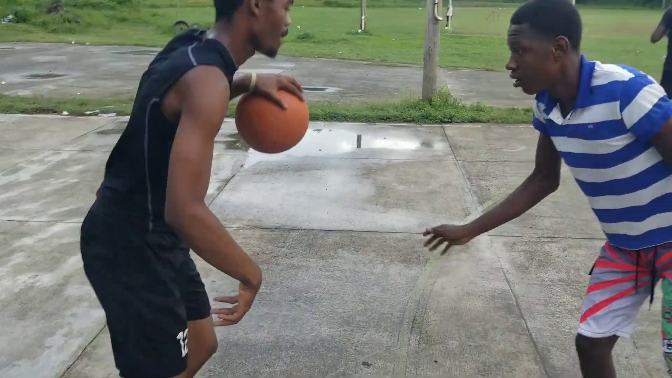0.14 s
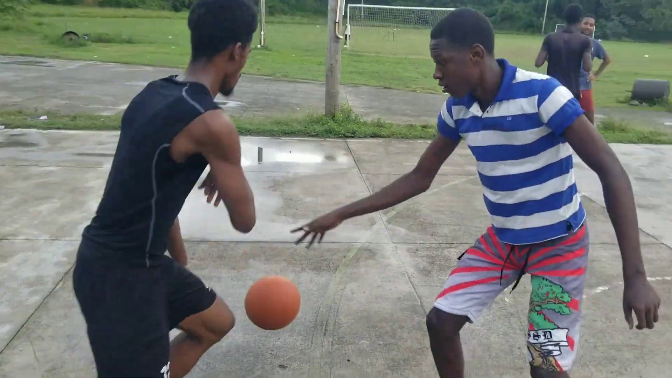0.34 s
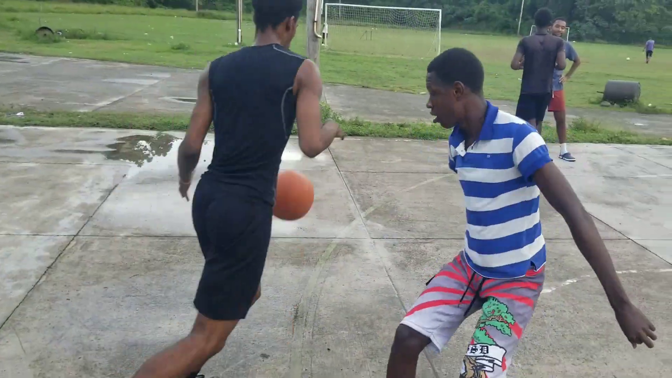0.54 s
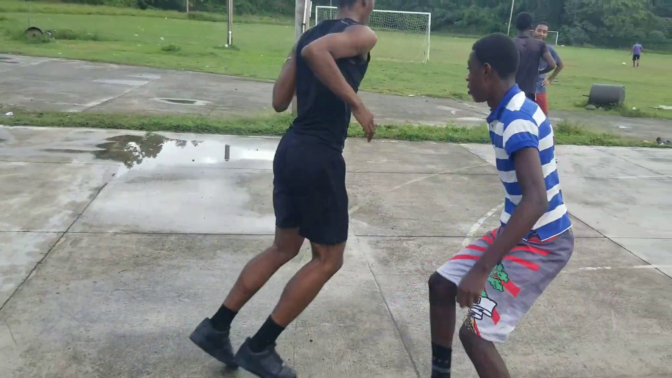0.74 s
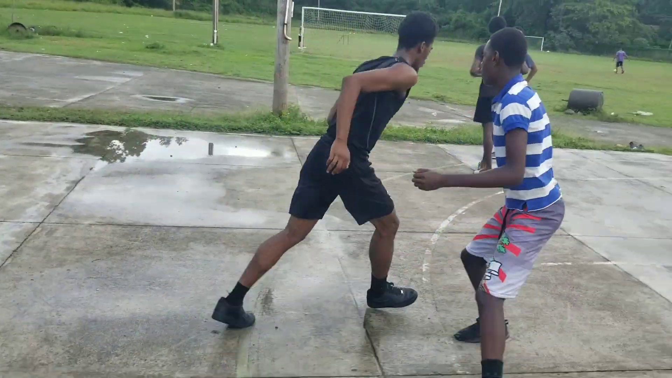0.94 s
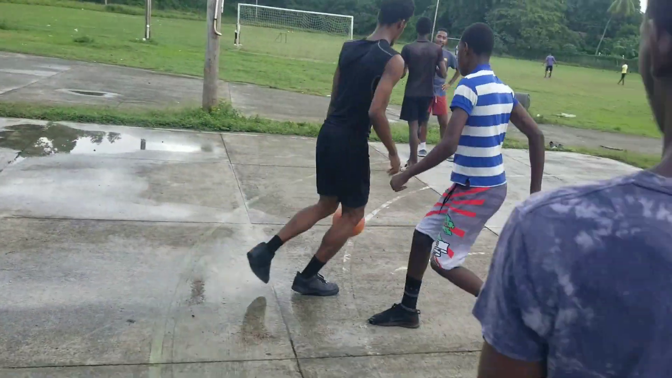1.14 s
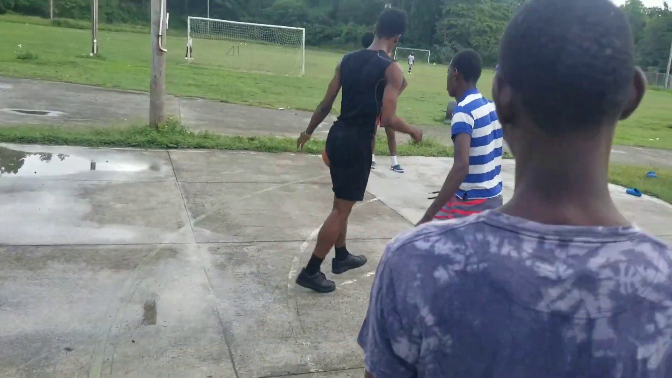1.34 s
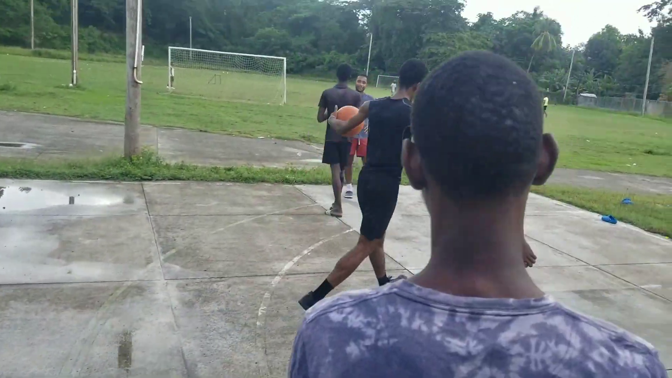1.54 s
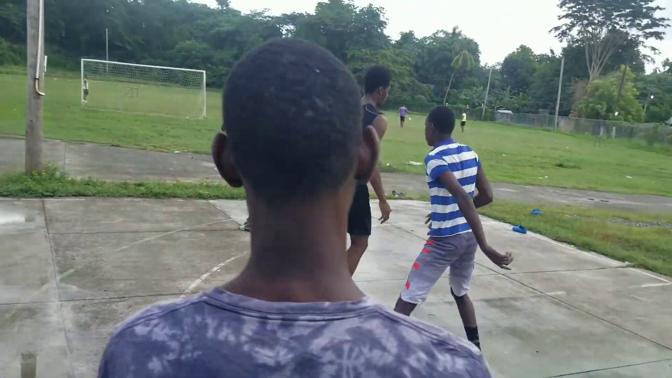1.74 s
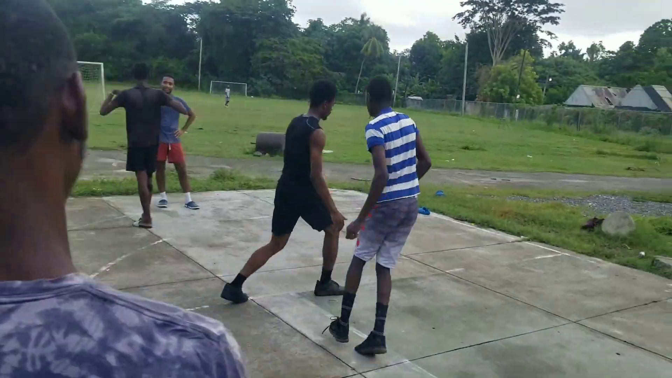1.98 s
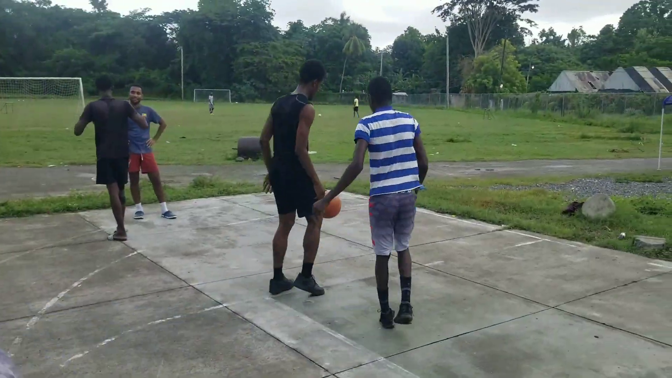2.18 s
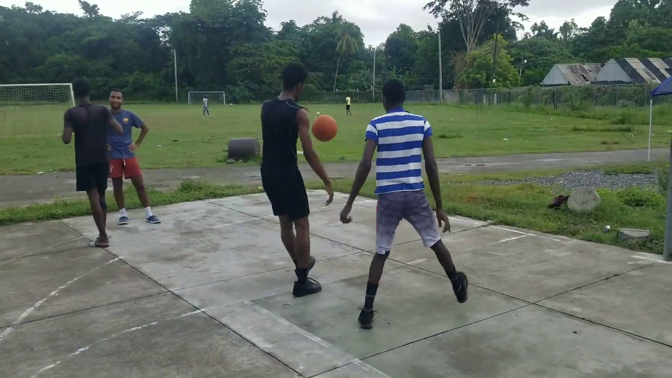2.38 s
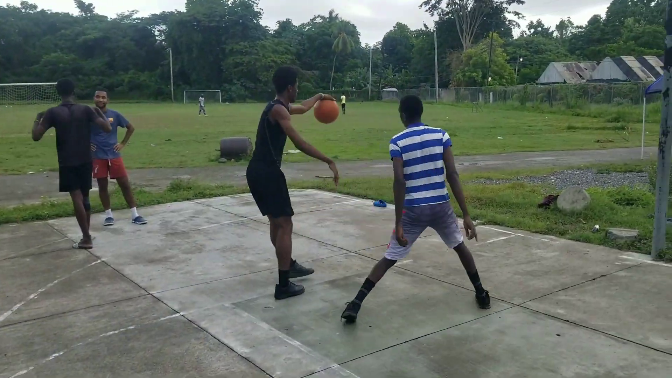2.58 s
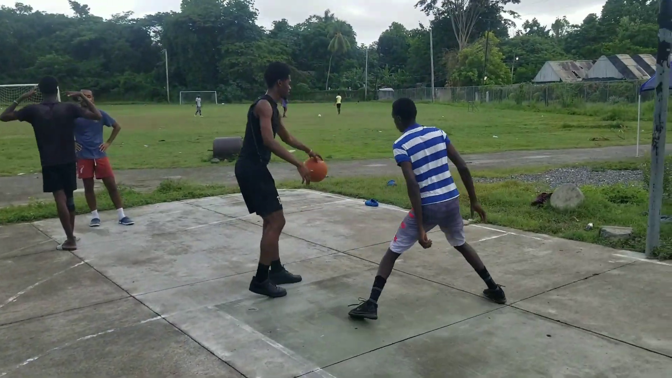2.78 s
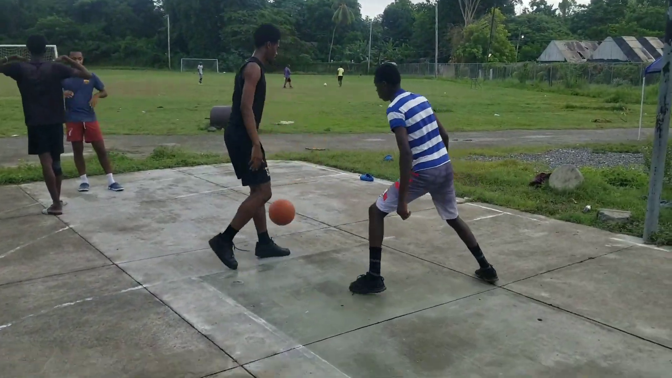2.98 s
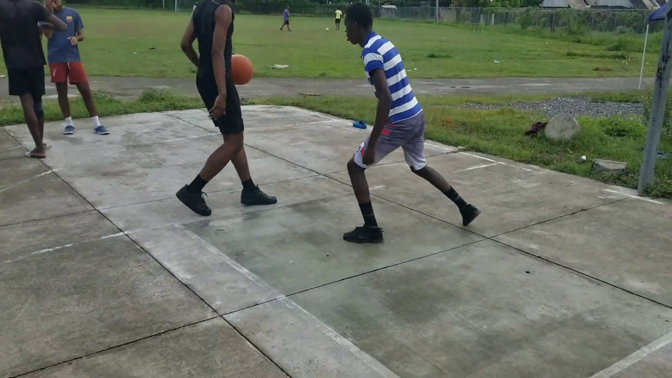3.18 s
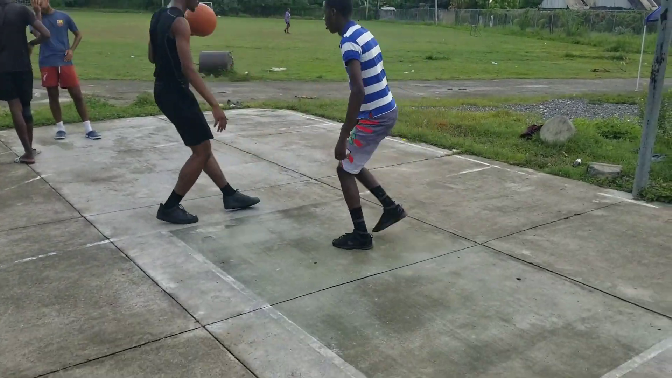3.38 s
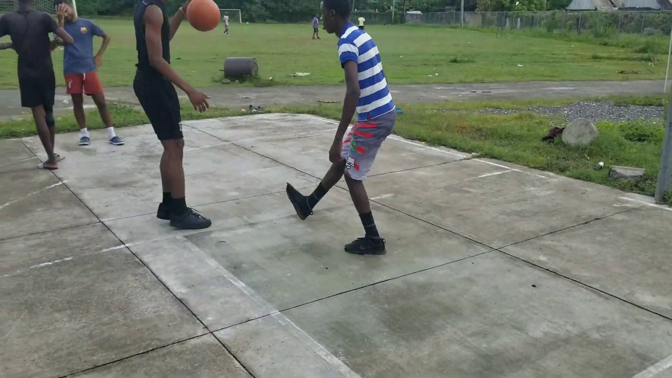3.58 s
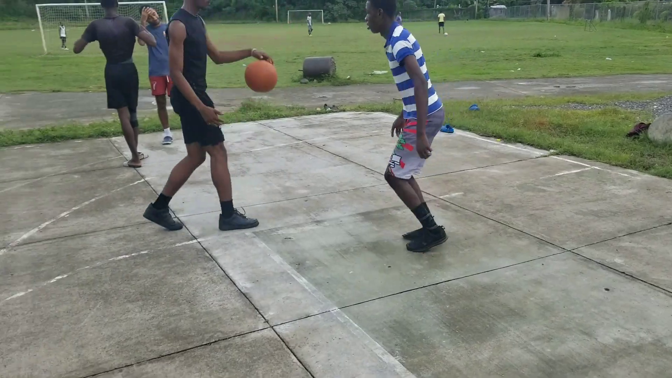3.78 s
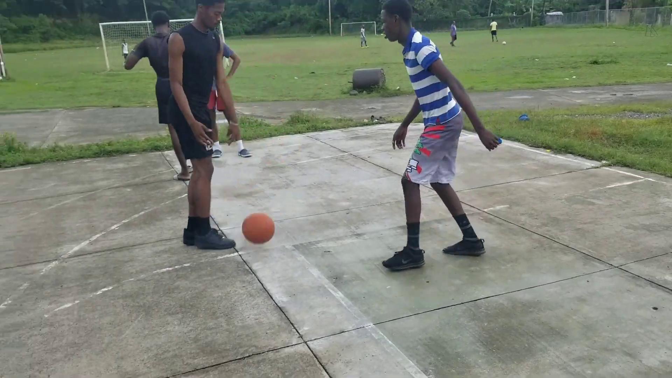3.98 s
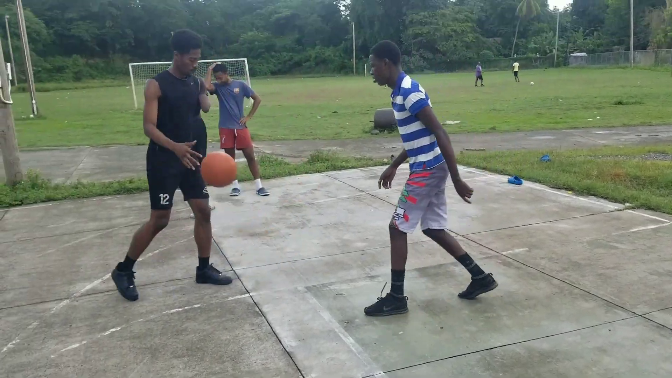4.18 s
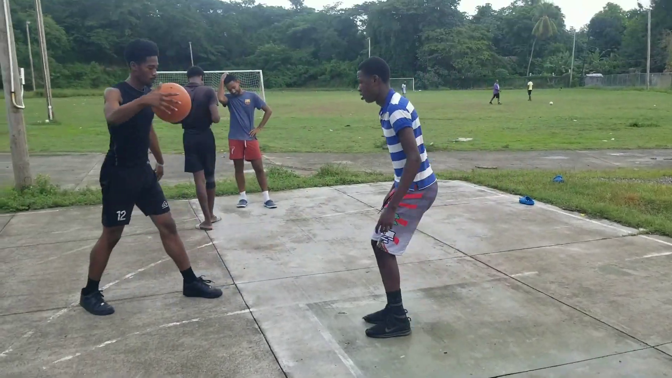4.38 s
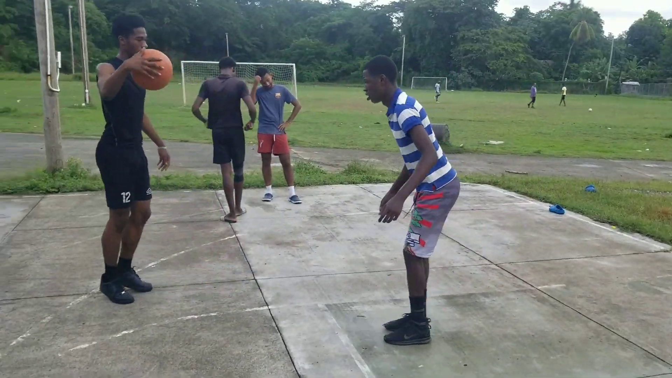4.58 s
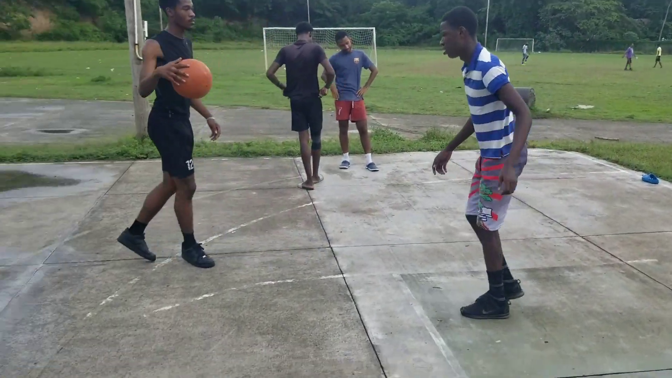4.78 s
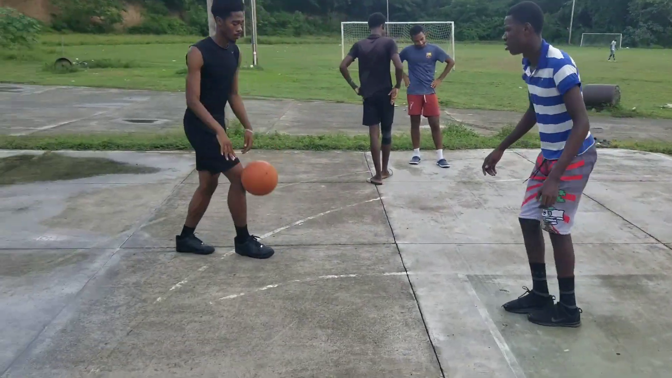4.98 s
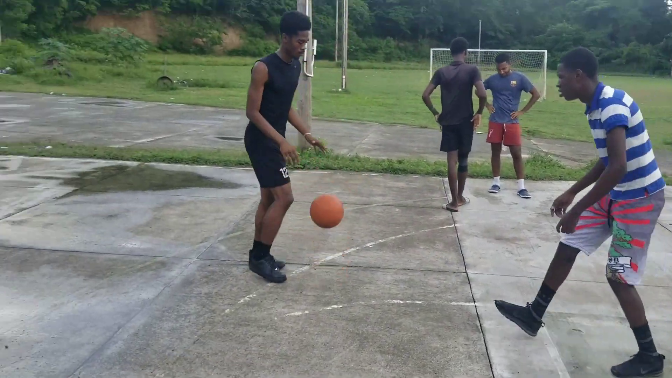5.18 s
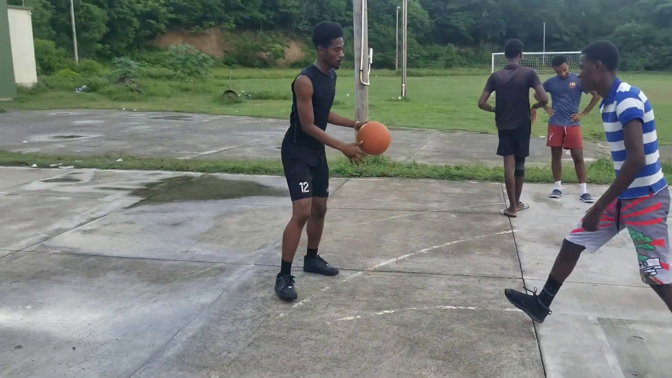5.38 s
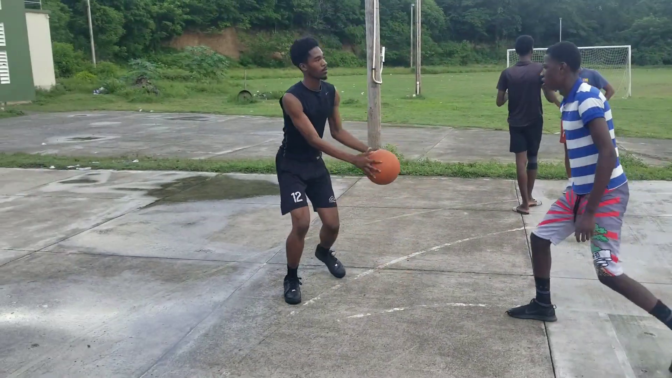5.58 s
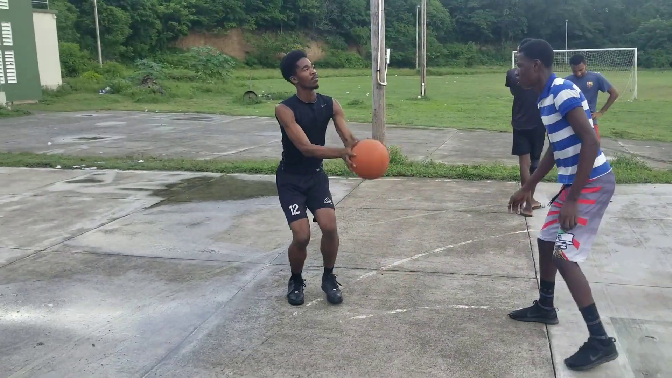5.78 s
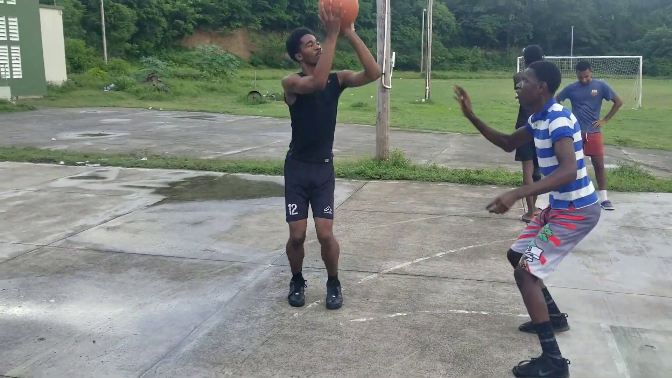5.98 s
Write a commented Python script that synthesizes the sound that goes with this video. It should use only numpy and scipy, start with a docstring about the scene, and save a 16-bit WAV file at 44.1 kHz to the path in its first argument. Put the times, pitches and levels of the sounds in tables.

```python
"""A basketball is dribbled on an outdoor concrete court: each bounce is a slap, a thump and a ring of skin and air.
Rubber soles scuff and drag on the gritty slab, made from clumped noise; short clicks and puffs are taps.
Walls near the court throw the bounces and taps back as echoes and a spread-out noise tail.
Far birds call with wavering tones over a quiet field and a low rumble, both made from shaped noise."""
import sys
import numpy as np
from scipy import signal
from scipy.fft import rfft, irfft, next_fast_len
from scipy.io import wavfile
from scipy.ndimage import uniform_filter1d, map_coordinates

SR = 44100
rng = np.random.default_rng(int(sys.argv[2]) if len(sys.argv) > 2 else 0)


def transcribe(signal):
    """Save signal, clipped to [-1, 1], as a 16-bit WAV file at the path in sys.argv[1]."""
    frames = np.atleast_2d(signal).T
    limited = np.clip(frames, -1, 1)
    pcm = np.round(limited * 32767).astype(np.int16)
    wavfile.write(sys.argv[1], SR, pcm)


N = 265923

# Ball bounces. Each row: start in seconds, slap level in dB, panel level in dB relative to the slap,
# panel pitch in Hz, thump level in dB, contact time in seconds, skin ring in dB, air ring in dB.
BOUNCES = [(0.42, 7, -32, 2720, -12, 0.012, -19, -31.5),
           (1.2046, 7.5, -14.5, 3120, -15.5, 0.012, -23, -43.5),
           (2.0998, 5, -23, 2830, -18, 0.013, -23, -47), (2.975, 7.5, -39, 2590, -17, .014, -24, -55),
           (4.0209, 6, -14.5, 2840, -15, 0.013, -19.5, -40),
           (5.117, 6.5, -13, 2640, -16, 0.01396, -23.5, -41)]
# A palm meets the ball. Each row: start in seconds, level in dB.
CATCHES = [(1.546, -45), (1.572, -47), (2.394, -68), (3.078, -67), (5.331, -39)]
# Ringing of the ball's skin. Each row: pitch in Hz, relative level in dB, time to fall 60 dB in seconds.
SKIN_MODES = [(392, -4, .08), (300, -7, 0.04), (440, -6, 0.06), (520, -8, .045), (245, -7, .04)]
# Ringing of the air inside the ball. Each row: pitch in Hz, relative level in dB, time to fall 60 dB in seconds.
AIR_MODES = [(942, 1, .2), (1405, -7.5, .08), (2116, -5, 0.5), (2810, -3, 0.34), (3198, -9, 0.4)]
# Tone of the bounces and taps: full bass, little treble above 9 kHz. Each row: frequency in Hz, gain in dB.
HIT_TONE = [(30, 9), (6000, -4.5), (9000, -5.5), (12000, -26), (16000, -36)]

# Scuffs of a sole. Each row: time of full pressure in seconds, rise, hold and fall in seconds, grit level in dB,
# then weight, rubber and dust in dB relative to the grit, and the pitch of the hollow under the sole in Hz.
SCUFFS = [(0.0, .01, 0.02, 0.022, -43, -14, -10, -30, 1240),
          (0.082, 0.12, 0.0036, 0.014, -51, -1.5, -7.5, -23, 1300),
          (0.114, 0.007, 0.015, 0.026, -30.5, 2.5, -7, -13.5, 863),
          (0.167, 0.034, 0.027, 0.023, -37.5, -11.5, -11.5, -28.5, 710),
          (0.224, 0.022, 0.051, 0.043, -35.5, -12, -9, -12, 910),
          (0.336, .05, 0.11, .05, -59, -13, -20.5, -9, 1070),
          (0.418, 0.016, 0.0093, 0.028, -17.5, -6, -8, -13, 1285),
          (0.48, 0.025, 0.072, 0.038, -38.5, -17.5, -2, -13.5, 1006),
          (0.604, 0.06, 0.019, 0.013, -34, -13, -35, -15, 1130),
          (0.674, 0.075, .0, 0.075, -44.5, -1, -7, -23, 734),
          (0.792, 0.016, 0.0066, 0.012, -29.5, -13.5, -8, -5, 1150),
          (0.829, 0.022, 0.016, 0.016, -28.5, -5.5, -1.5, -6.5, 1260),
          (0.875, 0.025, 0.084, 0.047, -33.5, -6.5, -3, -8.5, 1130),
          (1.02, .1, .06, .1, -51.5, -9.5, -2, -16, 826),
          (1.148, 0.065, 0.02, 0.084, -45.5, -8.5, -4.5, -16, 1210),
          (1.205, 0.024, 0.066, 0.096, -49.5, -11, -2.5, -42, 450),
          (1.35, 0.046, 0.086, 0.074, -58, -12, -12, -21, 600),
          (1.398, 0.014, 0.035, 0.008, -38, -17.5, -1, -6, 730),
          (1.553, 0.036, 0.03, 0.088, -58.5, -4, -1, -24, 426),
          (1.752, 0.18, 0.043, 0.14, -65.5, -4.5, 0, -28, 740),
          (1.952, 0.016, 0.031, 0.072, -36.5, -14, -5.5, -12.5, 820),
          (2.092, 0.029, 0.022, 0.037, -32, -19, -1, -9, 1020),
          (2.202, 0.034, 0, 0.061, -36, -4.5, -2, -26, 670),
          (2.349, 0.027, 0.011, 0.021, -41, -23, -13, -17, 1130),
          (2.394, 0.01, 0.0021, 0.015, -52, -11, -7, -22, 467),
          (2.459, 0.0059, .0, 0.038, -41.5, -35, -30, -26, 597),
          (2.53, 0.02, 0.064, .04, -57.5, 4.5, -26, -18, 1140),
          (2.636, 0.059, 0.033, .08, -33, -1, 0.5, -6, 1200),
          (2.734, 0.26, 0.046, 0.059, -33.5, -14, -6, -15, 895),
          (2.978, 0.047, 0.022, 0.017, -40.5, -27, -9, -10, 1200),
          (3.048, 0.069, 0, 0.14, -47.5, -10, -13, -11.5, 574),
          (3.196, 0.016, 0.0064, .015, -38.5, -38, -20, -30, 930),
          (3.235, 0.058, .0, 0.12, -60.5, -16.5, -12, -16, 810),
          (3.389, 0.0059, 0.0027, 0.0081, -45, -14, -8, -23, 1000),
          (3.441, 0.026, .0, .02, -38, -18, -4, -13, 1140),
          (3.475, 0.025, .045, 0.011, -26.5, -9.5, -9.5, -7, 990),
          (3.536, 0.087, 0.033, .03, -42, -11, 0, -16, 850),
          (3.608, 0.072, .03, .06, -42, -5, -4.5, -17, 810),
          (3.664, 0.054, 0.041, .07, -40, -4, -1, -10, 960),
          (3.724, 0.0038, 0.017, 0.043, -22.5, -6, -12.5, -8, 950),
          (3.91, 0.043, 0.14, 0.11, -34, -6, -1.5, -13, 910),
          (4.062, 0.22, 0.057, 0.032, -42, 3, 3, -5, 950),
          (4.148, 0.015, 0.0038, 0.045, -40.5, -7, -11, -3.5, 760),
          (4.217, 0.15, 0.074, 0.086, -54.5, -9, -6.5, -14, 474),
          (4.365, 0.017, 0.043, .08, -31.5, -12, -5.5, -11.5, 880),
          (4.43, 0.038, 0.036, 0.044, -40.5, -0.5, 1.5, -7.5, 930),
          (4.557, 0.09, 0.0057, 0.11, -39, 0.5, -2, -8, 693),
          (4.636, .1, 0.033, 0.058, -47.5, -2.5, -4.5, -27, 790),
          (4.917, 0.047, 0.023, 0.057, -42.5, -6, -10.5, -7.5, 955),
          (4.98, .08, 0.062, .06, -54, -2, -7.5, -7, 830),
          (5.068, 0.038, 0.031, 0.019, -38, -11, -6.5, -5.5, 910),
          (5.125, 0.015, 0.0084, 0.015, -40, 10, 8, -31.5, 800),
          (5.287, 0.18, 0.022, 0.0079, -50.5, -37, -13, -35, 620),
          (5.31, 0.015, 0.022, 0.079, -41, -19, 0, -28, 430),
          (5.385, 0.038, 0.071, 0.26, -44, -6.5, -0.5, -18, 1180),
          (5.57, 0.092, 0.12, 0.045, -44, -10.5, -1, -16.5, 1650),
          (5.733, 0.44, .0, 0.031, -50.5, -22, -2.5, -25, 1320),
          (5.876, 0.038, .04, 0.02, -50, -21, -18, -12.5, 704),
          (6.008, 0.048, 0.012, 0.017, -37, 0, -4, -11, 1220)]
# Colours of the scrapes. Each row: frequency in Hz, relative level in dB per Hz.
GRIT_COLOUR = [(1290, -69.5), (2200, -55.5), (2670, -9), (3870, 2.5), (4710, 8), (5390, 2), (7240, -1),
               (9000, -10.5), (11700, -52.5), (19800, -120)]
DUST_COLOUR = [(4410, -30.5), (7500, -6.5), (9770, -13), (10600, -20.5), (12700, -29.5), (15100, -27.5),
               (16200, -49.5), (16500, -25.5)]
RUBBER_COLOUR = [(900, -25), (1300, 3), (1700, 0.5), (2500, 4.5), (3500, 2)]
# Steps between which the hollow under a sole moves. Each entry: pitch in Hz.
HOLLOW_HZ = [430, 580, 780, 1050, 1400]
SWING_DB = 20  # a scuff rises and falls this far in its rise and fall times
SAG_DB_PER_S = 37  # the drag weakens while it holds
SETTLE_DB, SETTLE_DB_PER_S = -27, 63.5  # loose grit rolls on after the sole lifts: level, fading speed
SETTLE_BODY_DB = -7.5  # rolling grit has less body than a pressed sole
HOLLOW_OCT_PER_S = -1.8  # the hollow deepens as the heel lifts

# Soles and fingers landing. Each row: start in seconds, level in dB, click pitch in Hz,
# dull knock in dB relative to that level.
TAPS = [(0.0446, -31, 1960, -37), (0.14, -15.5, 3830, -27), (0.1632, -19, 3550, -22),
        (0.169, -18.5, 3580, -26.5), (0.1856, -20, 3700, -40), (0.2, -23.5, 3730, -27),
        (0.269, -20, 4900, -28.5), (0.3957, -10.5, 5400, -37), (0.4634, -11, 4100, -3),
        (0.5387, -24.5, 4270, 1), (0.62, -21, 5550, -42), (0.673, -19.5, 3370, -33.5),
        (0.7764, -20.5, 6900, -27), (0.7943, -28, 3120, -2.5), (0.8063, -9.5, 2970, -70),
        (0.8747, -28, 2920, -13), (0.9992, -28, 4600, -1), (1.154, -45, 4390, -30.5),
        (1.221, -16, 4480, -33), (1.3367, -33.5, 4260, -46), (1.3975, -24, 3850, -36),
        (1.5511, -34, 5030, -18), (1.9387, -28.5, 4500, -28), (1.9622, -16.5, 4650, -8),
        (2.02, -34, 4770, -34), (2.068, -26, 4530, -32), (2.2052, -16.5, 2050, -8), (2.337, -30, 4670, -34),
        (2.3958, -39, 2740, -27), (2.4575, -44, 4900, -26.5), (2.512, -29, 4840, -30),
        (3.116, -33.5, 4800, -31), (3.196, -32, 5140, -32), (3.388, -33.5, 3500, -38),
        (3.4245, -27.5, 5470, -17), (3.4634, -15, 4450, -13), (3.728, 0, 3160, -40), (3.9194, -32, 2800, 5),
        (4.153, -17.5, 7450, -25.5), (4.283, -38, 5100, -33), (4.3483, -30.5, 4470, -58),
        (4.365, -28, 4280, -21), (4.9167, -26, 6630, -34), (5.257, -43, 2720, -45), (5.307, -34, 2220, -28),
        (5.3815, -42, 4720, -29), (5.4512, -26.5, 4850, -3.5), (5.88, -29.5, 7200, -33.5),
        (5.9932, -23, 3120, -8)]
# A heel comes down hard. Each row: start in seconds, level in dB.
STOMPS = [(1.964, -33.5), (2.208, -22), (3.464, -39.5), (3.724, -34.5), (4.554, -40)]

# Hard faces that echo. Each row: delay in seconds, level in dB.
ECHOES = [(.033, -28)]
# Far faces that return only the boom. Each row: delay in seconds, level in dB.
FAR_WALLS = [(.072, -29.5), (0.112, -31.5), (.16, -28.5)]
# Dying away of the wall tail. Each row: frequency in Hz, time to fall 60 dB in seconds.
WALL_DECAY = [(60, 0.21), (110, 0.32), (200, 0.2), (400, 0.13), (2000, .25), (8000, 0.16)]
# Tone of the wall tail. Each row: frequency in Hz, gain in dB before an overall cut.
WALL_GAIN = [(40, -10), (110, -15), (300, 13), (3000, -3.5), (9000, -2.5)]

# Far crowing, one list for each call. Each row: time in seconds, basic pitch in Hz, level in dB before flutter.
CROWS = [
    [(1.66, 857, -72), (1.76, 868, -61), (1.93, 822, -68), (2.25, 812, -56.5), (2.45, 774, -65.5),
     (2.6, 810, -65)],
    [(4.2, 870, -65), (4.3, 880, -88), (4.72, 923, -75), (4.84, 938, -69.5), (4.95, 990, -75)],
    [(5.72, 865, -89.5), (5.79, 860, -79.5), (5.9, 840, -72.5), (5.97, 820, -91)],
]
# Voice of each crowing call. Each row: basic pitch in dB relative to its octave, hoarseness from 0 to 1.
CROW_TONE = [(-30, .045), (4, .01), (-20, .015)]
# A thin high chirp. Each row: time in seconds, pitch in Hz, level in dB before flutter.
CHIRP = [(5.7, 7560, -82), (5.76, 7480, -70), (5.86, 7520, -61), (5.93, 7300, -57), (5.96, 7200, -82)]

# Colours of the field and its rumble. Each row: frequency in Hz, relative level in dB per Hz.
FIELD_COLOUR = [(150, -47.5), (250, -17.5), (435, -3), (846, -37), (930, -6.5), (1060, -15.5),
                (1520, -32.5), (1670, -5), (2370, -37), (7640, -34), (11000, -55), (14300, -98),
                (22000, -120)]
RUMBLE_COLOUR = [(15, -27.5), (25, 5), (54, 6), (75, -8.5), (129, -2), (151, -16.5), (239, -13), (300, -17),
                 (390, -44), (660, -120)]
# Uneven strength of the rumble. Each row: time in seconds, level in dB before its faster wobble.
RUMBLE_LEVEL = [(0.0, -55.5), (0.4, -57), (1.96, -63), (2.18, -49.5), (2.47, -61), (2.92, -59), (3.49, -63),
                (4.21, -52.5), (5.1, -66.5), (5.32, -47), (5.54, -61), (6.03, -59.5)]
# Colour of the microphone hiss. Each row: frequency in Hz, relative level in dB per Hz.
HISS_COLOUR = [(9000, -34), (12000, -5.5), (14500, 7), (16500, -6)]
TOP_HZ = 15900  # the sound is band-limited: it fades out just below this frequency


def ball():
    """The skin slaps the slab, the ball squashes and springs back, then skin and air ring."""
    out, t = np.zeros(N), np.arange(SR // 2) / SR
    for s, slap_db, panel_db, panel_hz, thump_db, contact, skin_db, air_db in BOUNCES:
        slap = -np.sin(2 * np.pi * 5300 * t) * amp(-60 * t / 0.0012)
        panel = np.sin(2 * np.pi * panel_hz * t) * amp(panel_db - 60 * t / 0.012)
        blow = slap - panel
        blow = blow - uniform_filter1d(blow, size=15)  # keep the sharp part
        # the pimpled skin rolls onto grit
        patter = 0.06 * rng.standard_normal(len(t)) * amp(-60 * t / 0.03)
        # slow to flatten, quick to spring back
        squash = np.sin(np.pi * np.clip(t / contact, 0, 1) ** 1.3) ** 2
        # shaped like the second derivative of a sine to the fourth power
        thump = squash * (3 - 4 * squash)
        ring = amp(skin_db) * rings(SKIN_MODES, t) + amp(air_db) * rings(AIR_MODES, t)
        ring = ring * (1 - np.exp(-t / 0.0051))  # the ring builds up softly
        add(out, s, amp(slap_db) * (blow + patter) + amp(thump_db) * thump + ring)
    for s, db in CATCHES:
        add(out, s, amp(db) * rings(SKIN_MODES, t) * (1 - np.exp(-t / 0.0011)))
    return out


def rings(modes, t):
    """Fading tones, each with a random strength and a random slow beat."""
    total = np.zeros(len(t))
    for hz, db, t60 in modes:
        fade = amp(db + rng.normal(0, 2.6) - 60 * t / t60)
        beat = 1 + 0.49 * np.sin(2 * np.pi * (rng.uniform(3.4, 17) * t + rng.uniform()))
        total += fade * beat * np.sin(2 * np.pi * hz * t)
    return total


def soles():
    """Each scuff rises, holds and falls, with its own shares of grit, rubber, dust and body."""
    columns = np.transpose(SCUFFS)[:, :, None]
    s, rise, hold, fall, grit_db, weight_db, rubber_db, dust_db, hollow_hz = columns
    clock = np.arange(0, N / SR, 0.001)
    t = clock - s
    after = np.maximum(t - np.abs(hold), 0)  # time since the hold ended
    rise_db = SWING_DB * np.minimum(t, 0) / np.abs(rise)
    held_db = grit_db + rise_db - SAG_DB_PER_S * np.clip(t, 0, np.abs(hold))

    # twice the dB turns an amplitude into a power, so overlapping scuffs add as powers
    pressed = amp(2 * (held_db - SWING_DB * after / np.abs(fall)))
    loose = amp(2 * (held_db + SETTLE_DB - SETTLE_DB_PER_S * after))
    body = (pressed + amp(2 * SETTLE_BODY_DB) * loose) * amp(2 * weight_db) + 1e-30
    powers = [(pressed + loose) * amp(2 * db) for db in (0, rubber_db, dust_db)]
    powers.append(body)
    layers = [np.sqrt(np.sum(power, axis=0)) for power in powers]

    # the scuff with the most body has the most say in the hollow's pitch
    octaves = np.log2(hollow_hz) + HOLLOW_OCT_PER_S * np.maximum(t, 0)
    octave = np.sum(body * octaves, axis=0) / body.sum(axis=0)
    centre = np.clip(2 ** octave, HOLLOW_HZ[0], HOLLOW_HZ[-1])
    grit, rubber, dust, weight, centre_hz = curves(np.transpose([clock, *layers, centre]))

    clump_db = 0.9 * wobble(90) + 2.3 * wobble(350)  # stick and slip, shared by all layers
    sound = grit * scrape(GRIT_COLOUR, clump_db, spike_db=3.5, patchy_db=2.5)
    sound += dust * scrape(DUST_COLOUR, clump_db, spike_db=6, patchy_db=2.5)
    sound += weight * hollow(centre_hz, clump_db)
    sound += rubber * scrape(RUBBER_COLOUR, clump_db, spike_db=3, patchy_db=3.5)
    return sound


def scrape(spectrum, clump_db, spike_db, patchy_db):
    """Sand grains crushed under rubber: spiky, clumped noise whose colour shifts in patches."""
    spikes = amp(spike_db * np.minimum(rng.exponential(size=N), 4))
    grains = rng.standard_normal(N) * spikes
    z = signal.stft(grains * amp(clump_db), nperseg=256)[2]
    # smooth random patches across frequency, then across time
    patches = uniform_filter1d(rng.standard_normal(z.shape), size=2, axis=0)
    patches = uniform_filter1d(patches, size=12, axis=1)
    patchy = signal.istft(z * amp(patchy_db * unit(patches)), nperseg=256)[1][:N]
    return coloured(patchy, spectrum)


def hollow(centre_hz, clump_db):
    """Scrape noise in the resonance under the sole, which moves as the foot rolls."""
    total, power = np.zeros(N), np.zeros(N)
    for hz in HOLLOW_HZ:
        near = np.exp(-(np.log(centre_hz / hz) / 0.3) ** 2)  # strongest when the centre is close
        peak = [(hz / 3, -32), (hz / 1.3, -8), (hz, 0), (hz * 1.3, -8), (hz * 2, -20)]
        total += near * scrape(peak, clump_db, spike_db=2.5, patchy_db=3)
        power += near ** 2
    return total / np.sqrt(power + 1e-9)


def taps():
    """A short click, a puff of grit and a dull knock at each landing; hard heels add a low push."""
    out, t = np.zeros(N), np.arange(SR // 10) / SR
    for s, db, hz, knock_db in TAPS:
        click = np.sin(2 * np.pi * hz * t) * amp(-60 * t / 0.0034)
        puff = 0.2 * rng.standard_normal(len(t)) * amp(-60 * t / 0.053)
        sharp = click + puff
        sharp = sharp - uniform_filter1d(sharp, size=25)  # remove the low part
        knock = np.sin(2 * np.pi * 900 * t) * amp(knock_db - 60 * t / 0.013) * (1 - np.exp(-t / 0.001))
        add(out, s, amp(db) * (sharp + knock))
    for s, db in STOMPS:
        add(out, s, np.sin(2 * np.pi * 110 * t) * amp(db - 60 * t / 0.023))
    return out


def walls(x):
    """A hard echo, dull far echoes and a diffuse tail that dies at a different speed in each pitch range."""
    hz, t, z = signal.stft(rng.standard_normal(SR // 2), SR, nperseg=512)
    fade = amp(-60 * t / along(WALL_DECAY, hz)[:, None])
    z = z * fade * (1 - np.exp(-t / 0.006))  # builds up, then dies
    even = z / np.linalg.norm(z, axis=1)[:, None]  # equal strength in every band
    tail = signal.istft(even, SR, nperseg=512)[1]
    late = np.pad(x, (400, 0))  # the tail starts 400 samples late
    diffuse = signal.fftconvolve(late, tail / np.linalg.norm(tail))[:N]
    out = filtered(diffuse, lambda f: amp(along(WALL_GAIN, f) - 16.5))
    for delay, db in ECHOES:
        add(out, delay, amp(db) * x)
    boom = filtered(x, lambda f: 1 / (1 + (f / 180) ** 4))
    for delay, db in FAR_WALLS:
        add(out, delay, amp(db) * boom)
    return out


def birds():
    """Hoarse far crowing, mostly strongest an octave above its basic pitch, and one thin high chirp."""
    out = np.zeros(N)
    for rows, (root_db, rough) in zip(CROWS, CROW_TONE):
        turn, gain = call(rows, rough, flutter_db=2.0)
        out += gain * (np.sin(2 * turn) + amp(root_db) * np.sin(turn))
    turn, gain = call(CHIRP, 0.022, flutter_db=6.5)
    return out + gain * np.sin(turn)


def call(rows, rough, flutter_db):
    """Phase and gain of a call with wavering pitch and level, silent outside its rows."""
    hz, db = curves(rows)
    s = np.arange(N) / SR
    turn = 2 * np.pi * np.cumsum(hz * (1 + rough * wobble(320))) / SR
    sounding = (s > rows[0][0]) * (s < rows[-1][0])
    return turn, amp(db + flutter_db * wobble(40)) * sounding


def field():
    """Leaves and insects far off, over an uneven low rumble: two layers of shaped, wavering noise."""
    hush = amp(-70.5 + 1.3 * wobble(1.1)) * coloured(rng.standard_normal(N), FIELD_COLOUR)
    rumble_db, = curves(RUMBLE_LEVEL)
    rumble = amp(rumble_db + 3.7 * wobble(17.0)) * coloured(rng.standard_normal(N), RUMBLE_COLOUR)
    return hush + rumble


def amp(db):
    """Turn dB into a plain multiplier."""
    return 10 ** (np.asarray(db) / 20)


def unit(x):
    """Scale x to an rms (average strength) of 1."""
    return x / np.sqrt(np.mean(x ** 2) + 1e-20)


def along(points, hz):
    """Read a curve of (Hz, value) points on a log frequency axis."""
    f, v = np.transpose(points)
    return np.interp(np.log(hz + 1), np.log(f + 1), v)


def curves(rows):
    """One value per sample for each column after the time."""
    s, *cols = np.transpose(rows)
    return [np.interp(np.arange(N) / SR, s, c) for c in cols]


def wobble(rate):
    """A smooth random curve shaped by rate random points a second."""
    knots = rng.standard_normal(int(N * rate / SR) + 4)
    return map_coordinates(knots, [np.arange(N) * rate / SR])


def filtered(x, response):
    """Change the strength of each frequency in x by response(Hz)."""
    m = next_fast_len(N + SR // 2)
    return irfft(rfft(x, m) * response(np.fft.rfftfreq(m, 1 / SR)), m)[..., :N]


def coloured(x, spectrum):
    """Filter x with this spectrum and scale it to rms 1."""
    points = [(1, -120)] + list(spectrum) + [(SR / 2, -120)]
    return unit(filtered(x, lambda hz: amp(along(points, hz))))


def add(track, s, sound):
    """Mix a sound into the track from time s in seconds."""
    part = track[round(s * SR):][:len(sound)]
    part += sound[:len(part)]


def scene():
    """Mix everything; only the bounces and taps are dulled and sent to the walls."""
    hits = filtered(ball() + taps(), lambda hz: amp(along(HIT_TONE, hz)))
    return (hits + walls(hits) + soles() + birds() + field())[None]


def record(dry):
    """The small microphone loses deep bass, hisses faintly and clips; the sound is then band-limited."""
    thin = signal.sosfilt(signal.butter(3, 48, "high", fs=SR, output="sos"), dry)
    thin = thin + amp(-88) * coloured(rng.standard_normal(N), HISS_COLOUR)
    clipped = np.clip(thin, -0.93, 0.93)
    return filtered(clipped, lambda hz: np.clip((TOP_HZ - hz) / 300, 0, 1))  # fades out over 300 Hz


dry = scene()
out = record(dry)
transcribe(out)
```